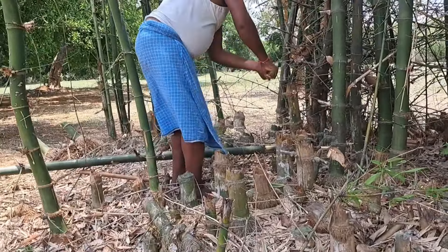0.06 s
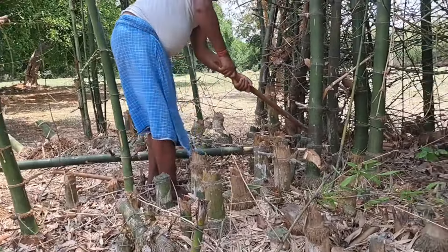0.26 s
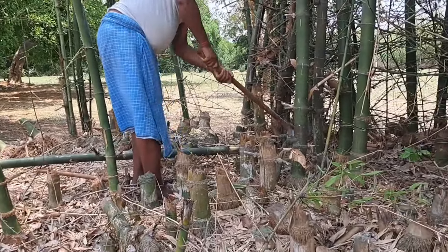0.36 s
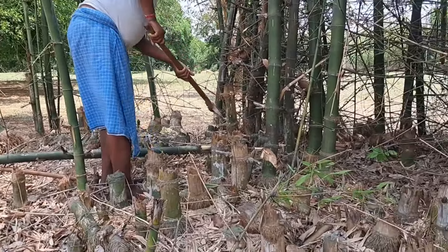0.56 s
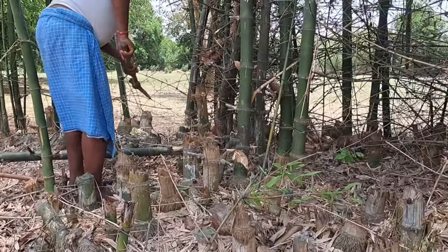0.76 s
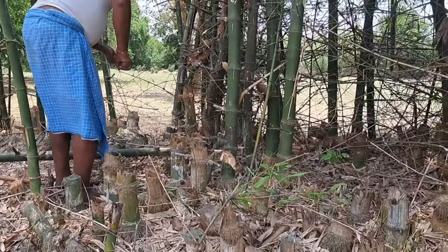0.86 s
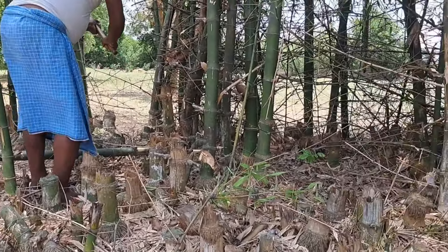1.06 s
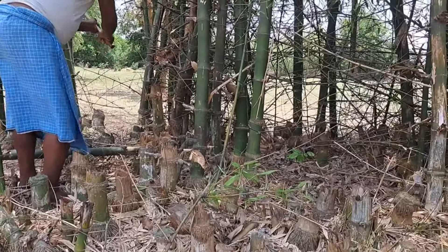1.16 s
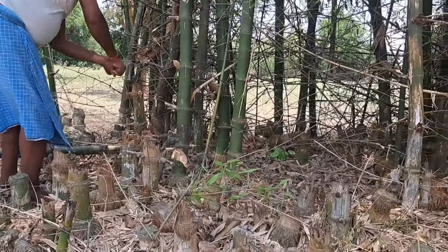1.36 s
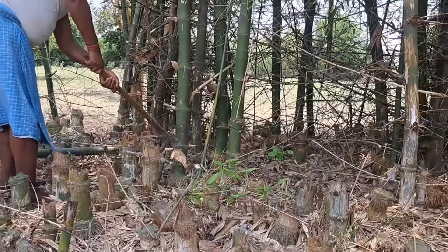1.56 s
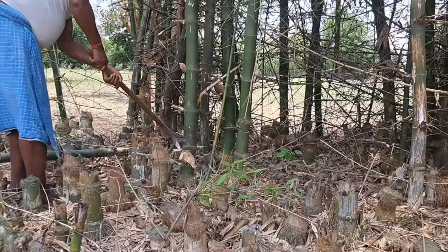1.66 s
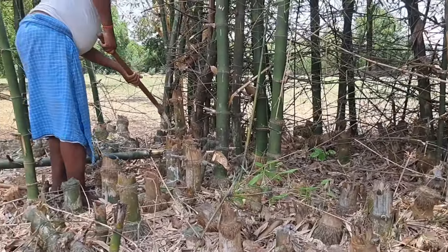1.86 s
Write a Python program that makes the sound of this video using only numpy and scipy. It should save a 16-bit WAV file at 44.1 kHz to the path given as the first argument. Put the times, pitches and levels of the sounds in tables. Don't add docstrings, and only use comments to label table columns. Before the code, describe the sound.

Bamboo chopping in a dry grove, heard from a few metres. Dull handling bumps open it; at 0.23 s a sharp, hollow crack rattles against neighbouring stems, with twig snaps and leaf rustle until about 0.45 s. Handling clicks come at 0.53 and around 1.0 s. A swish rises from 1.35 s into a softer, thuddier chop at 1.53 s, leaves shaking afterwards. Faint insect hiss continues; wind rumble strengthens near 1.5-1.65 s.

```python
import sys
import numpy as np
from scipy import signal
from scipy.fft import rfft, irfft
from scipy.io import wavfile
from scipy.ndimage import uniform_filter1d

SR = 44100
rng = np.random.default_rng(int(sys.argv[2]) if len(sys.argv) > 2 else 0)


def bounce(signal):
    frames = np.transpose(np.atleast_2d(signal))
    limited = np.clip(frames, -1, 1)
    pcm = np.round(limited * 32767).astype(np.int16)
    wavfile.write(sys.argv[1], SR, pcm)


def amplitude_ratio(level_db):
    exponent = np.asarray(level_db, float) / 20
    return 10 ** exponent


N = 83790
T = np.arange(N) / SR


def unit(x):
    return x / np.sqrt(np.mean(x ** 2))


def colour(x, points, size=4096):
    hz, db = np.array(points, float).T
    bins_hz = np.maximum(np.arange(size // 2 + 1) * SR / size, 1)
    cepstrum = irfft(np.interp(np.log(bins_hz), np.log(hz), db) * np.log(10) / 20)
    cepstrum[1:size // 2] *= 2
    cepstrum[size // 2 + 1:] = 0
    response = irfft(np.exp(rfft(cepstrum)))
    if x.ndim > 1:
        response = response[None]
    return signal.fftconvolve(x, response, axes=-1)[..., :x.shape[-1]]


def band(x, hz, wide_hz):
    return signal.lfilter(*signal.iirpeak(hz, hz / wide_hz, SR), x)


def fade(start_s, rise_s, t60_s, hold_s=0.):
    u = T - start_s
    release = np.exp(-np.log(1000) * np.maximum(u - rise_s - hold_s, 0) / t60_s)
    return np.clip(u / rise_s, 0, 1) * release


def walk(rate_hz):
    k = int(SR / rate_hz)
    steps = np.repeat(rng.standard_normal(N // k + 1), k)
    return unit(uniform_filter1d(uniform_filter1d(steps, k), k)[:N])


def pair(make, like_hz):
    low = signal.butter(1, like_hz, fs=SR)
    same = make()
    apart = np.array([make(), make()])
    return signal.lfilter(*low, same) + apart - signal.lfilter(*low, apart)


def grains():
    per_s, spread_db = 7000, 1.5
    hit = rng.random(N) < per_s / SR
    clicks = hit * rng.standard_normal(N) * amplitude_ratio(spread_db * np.minimum(rng.exponential(size=N), 3.))
    return unit(clicks + 0.46 * rng.standard_normal(N))


# pitch_hz, level_db
GROVE_SPECTRUM = [(300, -12.5), (900, -19), (1800, -17), (3000, -12), (4100, -16.5), (4900, -2.5),
                  (6000, -14), (12000, -17)]


def grove():
    hiss = unit(colour(rng.standard_normal((2, N)), GROVE_SPECTRUM))
    chirp = unit(band(rng.standard_normal((2, N)), 3150, 710)) * amplitude_ratio(-13.5 + 4 * walk(31))
    return amplitude_ratio(-54 + 0.34 * walk(5.5)) * (hiss * amplitude_ratio(0.35 * walk(30)) + chirp)


# start_s, left_level_db, right_level_db
GUSTS = [(0, -58, -41), (.2, -58, -52.5), (.35, -47.5, -50), (.5, -50.5, -52.5), (.61, -56.5, -56.5),
         (0.682, -44.5, -46), (.8, -60, -57), (0.952, -45, -45.5), (1.15, -42.5, -43), (1.3, -47, -48),
         (1.41, -47, -47), (1.48, -37, -37.5), (1.62, -35.5, -30), (1.72, -42, -44.5), (1.9, -50, -46.5)]
# pitch_hz, level_db
WIND_SPECTRUM = [(18, -12.5), (35, -7), (60, -4), (95, -2.5), (160, -18.5), (300, -23), (600, -47),
                 (1500, -84.5)]


def wind():
    start_s, *levels_db = np.array(GUSTS).T
    ports = []
    for level_db in levels_db:
        rumble = unit(colour(rng.standard_normal(N), WIND_SPECTRUM, size=16384))
        ports.append(rumble * amplitude_ratio(np.interp(T, start_s, level_db) + 2.1 * walk(25.06)))
    return np.array(ports)


# start_s, thump_level_db, thump_hz, click_level_db, click_hz
FINGER_BUMPS = [(.0088, -22, 227, -52, 1200), (0.0323, -32.5, 293, -55, 1500), (0.055, -18, 178, -46, 1210),
                (0.0798, -38, 300, -33, 1500), (0.0988, -26.5, 180, -56, 1210),
                (.1600, -33, 203, -60, 1200), (0.532, -18, 317, -17.5, 1900),
                (0.9744, -31.5, 340, -23.5, 1310), (0.9970, -32.5, 216, -26, 1000),
                (1.012, -32, 222, -51, 812), (1.044, -30, 453, -45, 2600), (1.0479, -24.5, 150, -25, 900)]
# start_s, level_db, pitch_hz, width_hz, t60_s
FINGER_RUBS = [
    (.0100, -47.5, 500, 500, 0.13),
    (0.057, -48.5, 493, 500, 0.16),
    (0.099, -50.5, 390, 500, 0.41),
    (0.532, -34, 295, 410, 0.099),
    (.9741, -22.5, 3080, 1000, 0.0069),
    (.9960, -39, 280, 200, .04),
    (0.533, -29, 900, 1200, 0.0093),
    (0.999, -48.5, 693, 900, 0.15),
    (1.0418, -36.5, 1170, 2460, 0.035),
    (1.045, -46, 1500, 2500, 0.017),
]


def bumps():
    sag, cycles, left_db = 0.45, 4.95, -43
    out, skin = np.zeros(N), rng.standard_normal(N)
    for start_s, db, hz, click_db, click_hz in FINGER_BUMPS:
        u = np.maximum(T - start_s, 0)
        turns = np.log1p(sag * hz * u / 2) * 2 / sag
        soft_start = np.sin(np.pi / 2 * np.clip(u * hz / 0.49, 0, 1)) ** 2
        envelope = soft_start * fade(start_s, 1 / SR, cycles / hz, 0.75 / hz)
        out -= amplitude_ratio(db) * envelope * np.sin(2 * np.pi * turns)
        out -= amplitude_ratio(click_db) * fade(start_s, 0.00015, 0.0012) * np.sin(2 * np.pi * click_hz * u)
    for start_s, db, hz, wide_hz, t60_s in FINGER_RUBS:
        friction = unit(band(band(skin, hz, wide_hz), hz, wide_hz))
        out += amplitude_ratio(db) * fade(start_s, 0.00016, t60_s) * friction
    return out * amplitude_ratio([[left_db], [0]])


# start_s, level_db
BLADE_SWISH = [
    (1.28, -75),
    (1.34, -50),
    (1.41, -38.5),
    (1.45, -38),
    (1.50, -33.5),
    (1.533, -37),
    (1.56, -49),
]


def swish():
    hz, wide_hz = 3150, 900
    air = band(rng.standard_normal((2, N)), hz, wide_hz)
    low_air = unit(band(rng.standard_normal((2, N)), 640, 2570))
    air = unit(band(air, hz, 2 * wide_hz)) + amplitude_ratio(-6) * low_air
    level_db = np.interp(T, *np.array(BLADE_SWISH).T, left=-150, right=-150)
    return air * amplitude_ratio(level_db + 1.3 * walk(49.7) + np.array([[-11.5], [-9]]))


# start_s, level_db, rise_s, t60_s, tilt_db_per_octave
LEAF_SHAKES = [(0.1425, -34, 0.011, 0.17, 3), (0.174, -40, 0.0051, 0.45, -2.5),
               (.240, -28, 0.0043, 0.64, -1.5), (0.297, -30, 0.007, 0.14, 0.6),
               (0.33, -46, 0.0021, 0.16, 2), (0.427, -43.5, 0.0072, 0.14, 2.5),
               (0.559, -44.5, 0.0092, 0.24, -2), (.712, -46.5, 0.0025, 0.18, -0.5),
               (0.73, -48, 0.006, 0.4, 0.5), (.76, -55.5, 0.031, 0.28, -4), (.846, -65, 0.004, 0.15, -1),
               (1.45, -42.5, 0.017, 0.85, -1), (1.4385, -44.5, 0.0015, 0.13, 13.5),
               (1.543, -23, 0.02, 0.4, -2), (1.61, -38.5, 0.015, 0.56, -3), (1.701, -42, 0.018, 0.45, -1),
               (1.788, -49.5, 0.021, 0.13, 1.5)]
# pitch_hz, level_db
LEAF_SPECTRUM = [(150, -23.5), (600, -7.5), (1500, -5.5), (2300, -3), (3200, -2), (6500, -4.5), (9000, -2),
                 (16000, -5.5)]


def leaves():
    dry, out = unit(colour(pair(grains, 1500), LEAF_SPECTRUM)), 0
    start_s, level_db, rise_s, t60_s, tilt_db = np.array(LEAF_SHAKES).T
    shapes = np.array([fade(*shake) ** 2 for shake in zip(start_s, rise_s, t60_s)])
    for octave in np.arange(-4, 2.4, .4):
        hz = 3500 * 2 ** octave
        power = amplitude_ratio(level_db + octave * tilt_db) ** 2 @ shapes
        out = out + band(dry, hz, hz * 0.32) * np.sqrt(power) * amplitude_ratio(3.5 * walk(90))
    return out * amplitude_ratio(-3.5)


# start_s, level_db, pitch_hz, t60_s
SOIL_THUDS = [
    (0.22, -31, 86.7, 0.17),
    (1.5375, -21, 94, 0.08),
    (1.614, -28, 53, 0.13),
    (1.605, -33.5, 160, 0.11),
]


def thuds():
    out = 0
    for start_s, db, hz, t60_s in SOIL_THUDS:
        out = out + amplitude_ratio(db) * fade(start_s, 0.0025, t60_s, .012) * np.sin(2 * np.pi * hz * (T - start_s))
    return out


# start_s, level_db, pitch_hz,
# t60_s
TWIG_SNAPS = [(.1800, -35.5, 3330, 0.038), (.2354, -10, 2495, 0.02), (.2700, -30, 3260, 0.023),
              (.2810, -30.5, 3100, .03), (.3005, -31, 4950, 0.025), (.3082, -31, 3150, 0.051),
              (.3084, -27.5, 5910, 0.018), (.3320, -36, 3460, 0.027), (.3330, -32, 5520, .03),
              (0.3745, -34, 3800, 0.018), (.3876, -24.5, 4534, 0.034), (.3880, -29.5, 6080, 0.031),
              (.3900, -37.5, 3000, 0.013), (.3960, -32, 4410, 0.024), (.4340, -43, 3150, 0.053),
              (.6720, -50, 2920, 0.047), (.7328, -35.5, 3104, 0.031), (.8505, -48, 3280, 0.031),
              (.9260, -53.5, 2590, 0.024), (1.0930, -54, 3290, .03), (1.1480, -52, 3300, 0.017),
              (1.2620, -53, 3300, 0.021), (1.4408, -40, 1218, 0.12), (1.4530, -45.5, 973, 0.12),
              (1.487, -40, 548, 0.084), (1.5360, -22, 3370, 0.04), (1.5360, -23.5, 2600, 0.034),
              (1.5653, -29, 2500, .04)]


def snaps():
    out, scrape = 0, rng.standard_normal(N)
    for start_s, db, hz, t60_s in TWIG_SNAPS:
        struck = np.sin(2 * np.pi * hz * (T - start_s)) * 0.98
        scraped = 0.6 * min(hz / 3000, 1) * unit(band(scrape, hz, hz * 0.12))
        out = out + amplitude_ratio(db) * fade(start_s, 0.00029, t60_s) * (struck + scraped)
    return out


# start_s, level_db, pitch_hz, t60_s
CHAMBER_RINGS = [(.2345, -14.5, 1022, .035), (.2350, -15.5, 1651, .045), (.2350, -22, 1434, 0.028),
                 (.2400, -21.5, 790, .05), (.2380, -18, 236.4, 0.062), (0.249, -17, 428, 0.055),
                 (.2490, -15, 1045, 0.054), (0.258, -16, 552, 0.075), (.2630, -19.5, 762, 0.045),
                 (.2940, -34, 555, 0.11), (1.5355, -21.5, 1287, 0.038), (1.5450, -22, 1093, .06),
                 (1.547, -27, 344, 0.054), (1.5575, -18, 571, .08), (1.5620, -26, 456, 0.077),
                 (1.5730, -29, 1092, 0.1), (1.5920, -31.5, 571, 0.096), (1.6330, -33.5, 530, 0.041)]


def rings():
    out = 0
    for start_s, db, hz, t60_s in CHAMBER_RINGS:
        out = out + amplitude_ratio(db) * fade(start_s, .003, t60_s) * np.sin(2 * np.pi * hz * (T - start_s))
    return out * amplitude_ratio([[1], [0]])


# pitch_hz, level_db, t60_s
FIRST_MODES = [(250, -23, 0.056), (318, -7, 0.13), (414.5, -10, 0.046), (536, -10.5, 0.088),
               (627, -8, 0.037), (799.5, -1, 0.051), (943, -12.5, 0.088), (990, -9.5, 0.063),
               (1031, -8, 0.06), (1085, 1, 0.094), (1273, -3, 0.046), (1446, -1.5, 0.027),
               (1618, -10, 0.048)]
# pitch_hz, level_db, t60_s
SECOND_MODES = [(163.5, -8, 0.12), (291.5, -9, 0.071), (403.6, -11, .07), (459, -9, .06),
                (561, -3.5, 0.063), (707, -4, 0.039), (958, -7, 0.076), (1080, -7.5, .06), (1291, 0, 0.056),
                (1440, -17, 0.02)]
# start_s, level_db, contact_ms
FIRST_KNOCKS = [
    (0.2357, -19.5, 0.2),
    (0.243, -25.5, 0.92),
    (.2500, -21.5, 0.63),
    (.2610, -23, 0.57),
    (0.271, -27, .55),
    (.2810, -30.5, 0.38),
]
# start_s, level_db, contact_ms
SECOND_KNOCKS = [
    (1.5349, -24, 0.33),
    (1.541, -36, 0.36),
    (1.5540, -27, 0.62),
    (1.562, -22.5, 0.99),
    (1.581, -37, 0.31),
]


def culm(modes, knocks):
    rattle_db, rattle_t60_s, ring_max_s = -18.5, 0.037, .09
    out, u = np.zeros(N), T[:SR // 5]
    mixes, rattles = rng.standard_normal((8, 14)), rng.standard_normal((8, 1500))
    for (start_s, db, contact_ms), mix, rattle in zip(knocks, mixes, rattles):
        ring = 0
        for (hz, mode_db, t60_s), shift in zip(modes, mix):
            decay = np.exp(-np.log(1000) * u / min(t60_s, ring_max_s))
            ring = ring + amplitude_ratio(mode_db + 3.07 * shift) * np.sin(2 * np.pi * hz * u) * decay
        drive = amplitude_ratio(rattle_db) * rattle * np.exp(-np.log(1000) * u[:len(rattle)] / rattle_t60_s)
        drive[0] = contact_ms < .35
        push = np.hanning(int(contact_ms * SR / 1000) + 3)
        force = np.convolve(drive, push / push.sum())
        i = int(start_s * SR)
        out[i:i + len(u)] += amplitude_ratio(db) * signal.fftconvolve(ring, force)[:len(u)]
    return out


# start_s, level_db, rise_s, hold_s, pitch_hz
BLADE_BLOWS = [
    (0.2349, -15.5, .0003, 0.0039, 3365),
    (1.531, -17, 0.0063, 0.007, 4320),
]


def cracks():
    out = 0
    for start_s, db, rise_s, hold_s, hz in BLADE_BLOWS:
        spikes = pair(grains, 2400)
        burst = unit(band(spikes, hz, hz * 0.69)) + amplitude_ratio(-6) * unit(spikes)
        out = out + amplitude_ratio(db) * fade(start_s, rise_s, 0.023, hold_s) * burst
    return out


# pitch_hz, level_db
PORT_RESPONSE = [(100, 4.5), (6500, 0), (7300, 1.5), (8400, -9.5), (9800, -8), (12000, -0.5), (15500, -4)]
# pitch_hz, level_db
RIGHT_RESPONSE = [(100, 2.5), (1300, 4), (2400, 8.5), (3200, 11.5), (4500, 6), (6200, 11), (7300, 2),
                  (16000, -1)]


def scene():
    blow = culm(FIRST_MODES, FIRST_KNOCKS) + culm(SECOND_MODES, SECOND_KNOCKS)
    blow = blow + snaps() + rings() + cracks()
    echo = pair(grains, 90) * fade(0.0019, 0.0086, 0.39)
    echo = echo / np.sqrt(np.mean(np.sum(echo ** 2, 1)))
    scattered = signal.fftconvolve(blow, echo, axes=1)[:, :N]
    air = blow + amplitude_ratio(-12.5) * scattered + thuds() + leaves() + swish() + grove()
    left, right = colour(air, PORT_RESPONSE)
    right = np.roll(colour(right, RIGHT_RESPONSE), shift=2)
    return np.array([left, right]) * amplitude_ratio(-3.5) + bumps() + wind()


def low_pass(x):
    return signal.sosfilt(signal.butter(12, 16600, fs=SR, output="sos"), x)


def record(dry):
    x = signal.sosfilt(signal.ellip(8, .2, 45, 15750, fs=SR, output="sos"), dry)
    x = signal.sosfilt(signal.butter(6, 38, "high", fs=SR, output="sos"), x)
    return low_pass(np.clip(x, -1, 1))


dry = scene()
out = record(dry)
bounce(out)
```